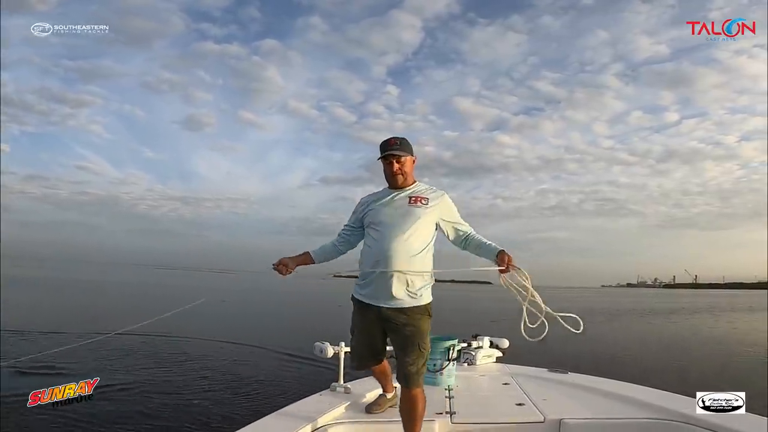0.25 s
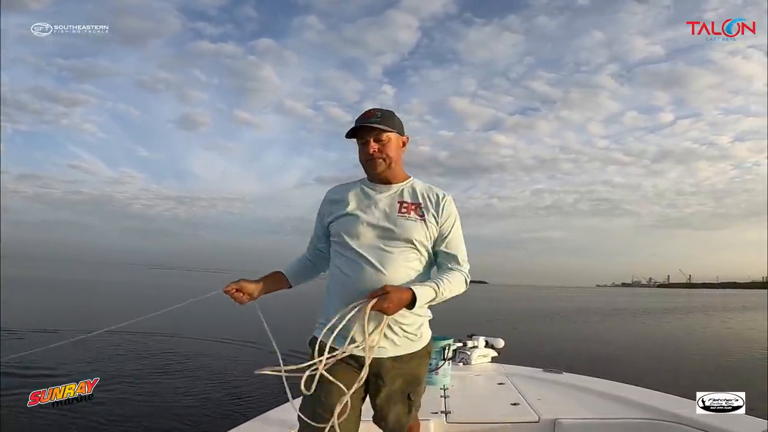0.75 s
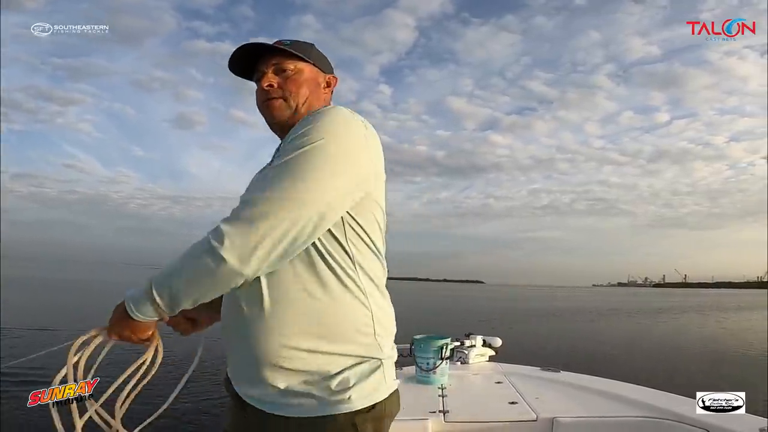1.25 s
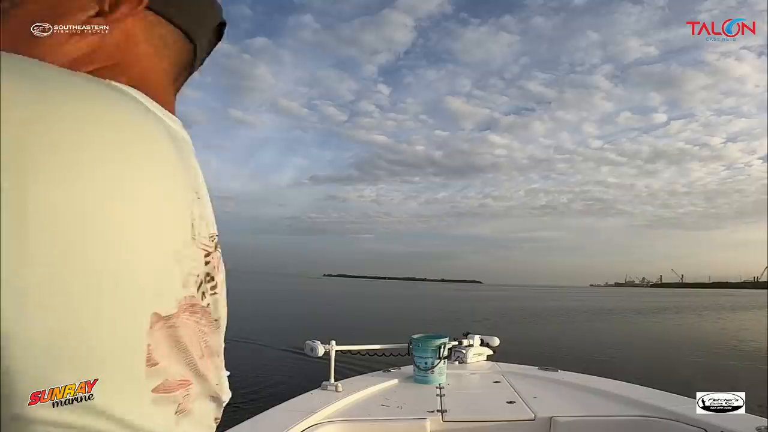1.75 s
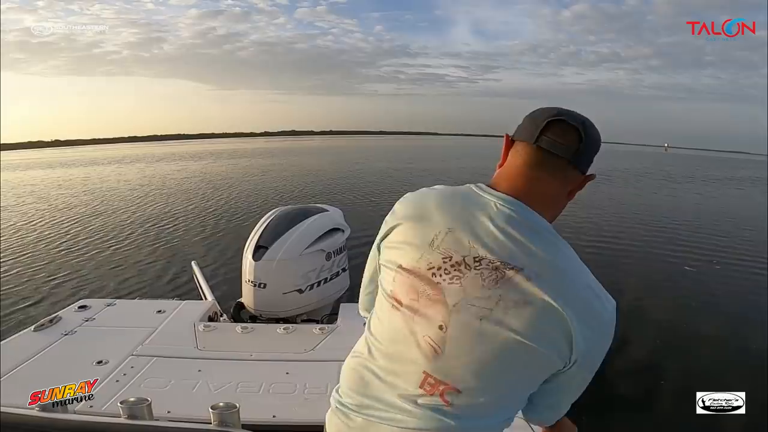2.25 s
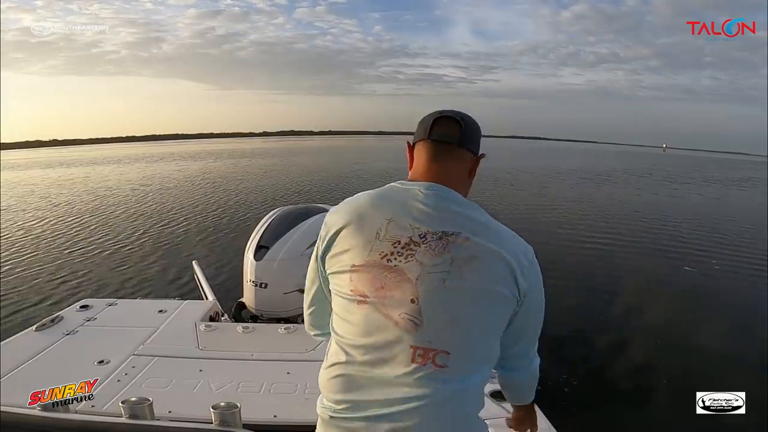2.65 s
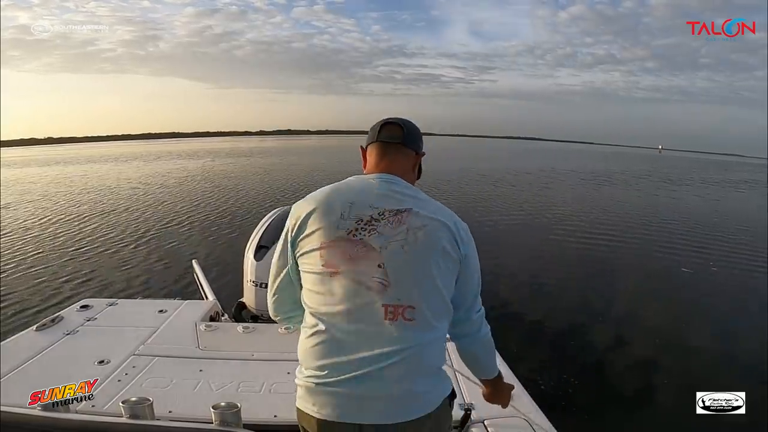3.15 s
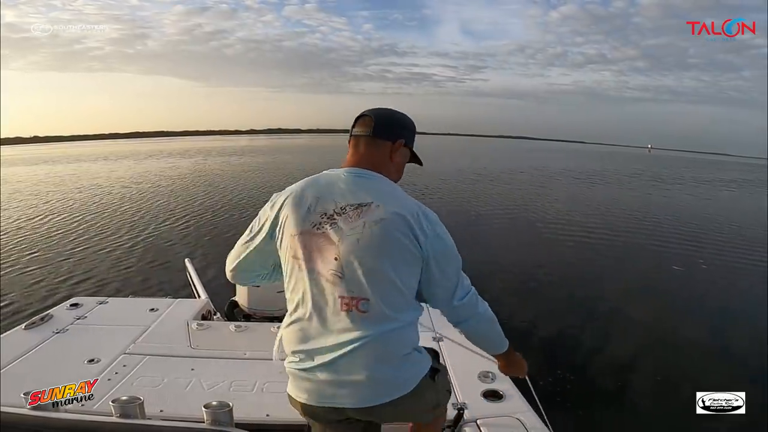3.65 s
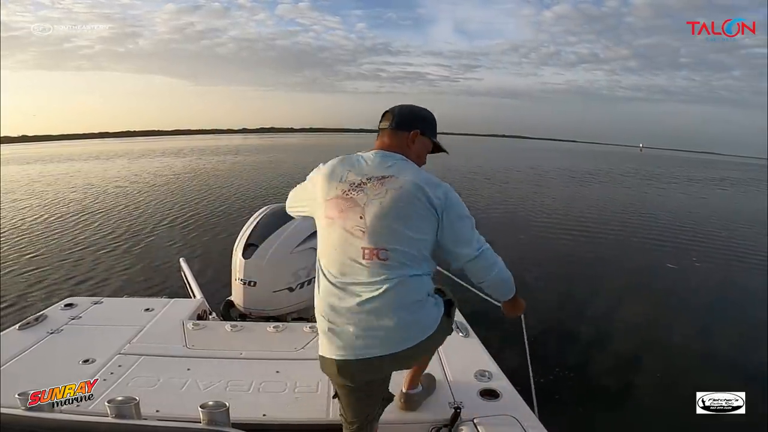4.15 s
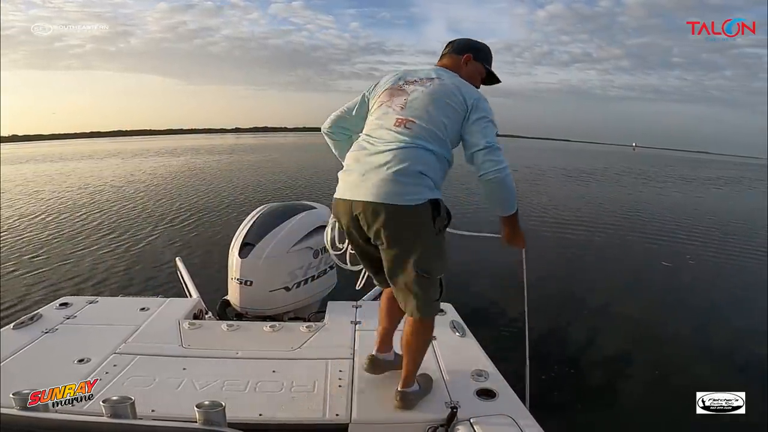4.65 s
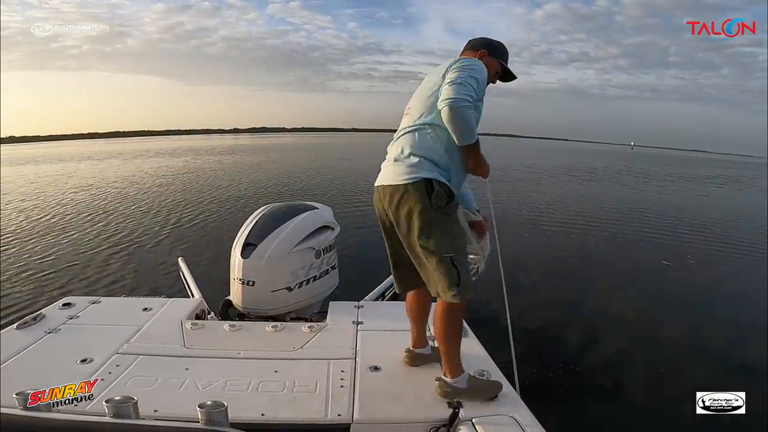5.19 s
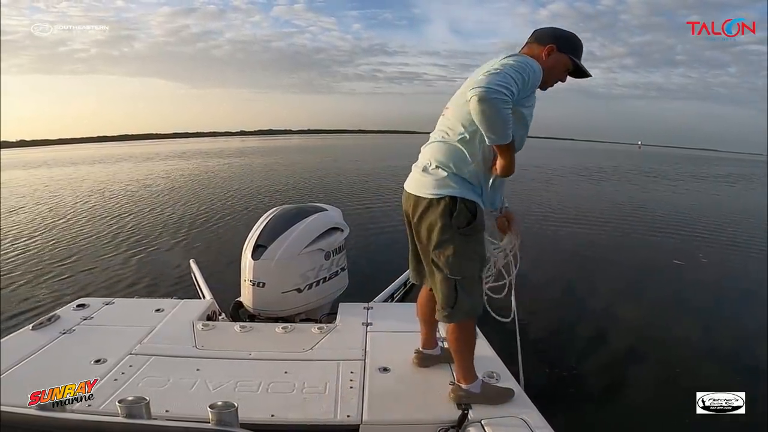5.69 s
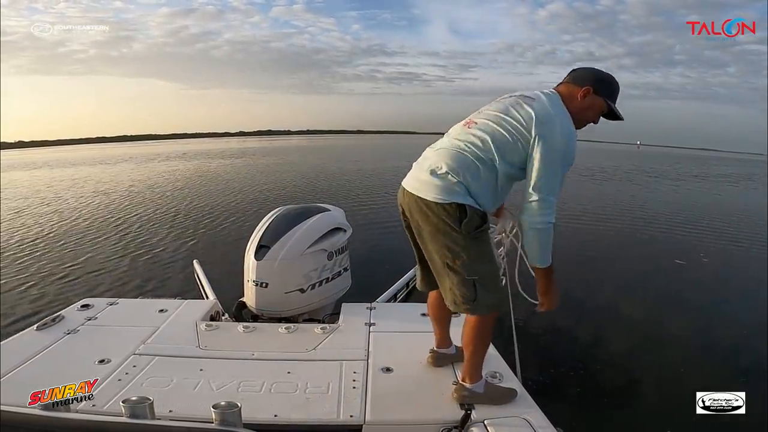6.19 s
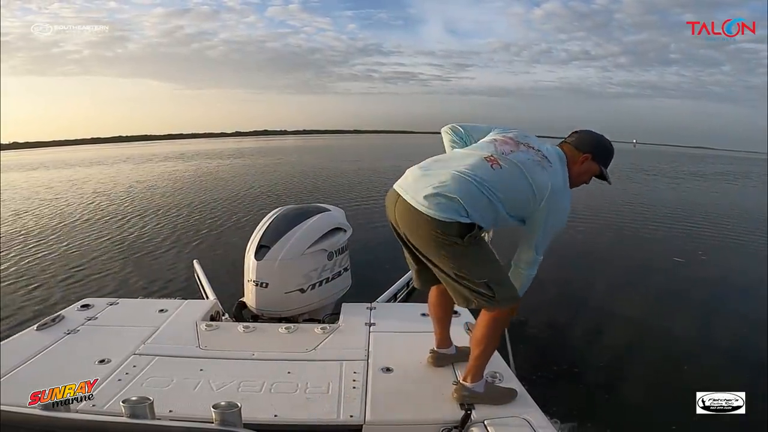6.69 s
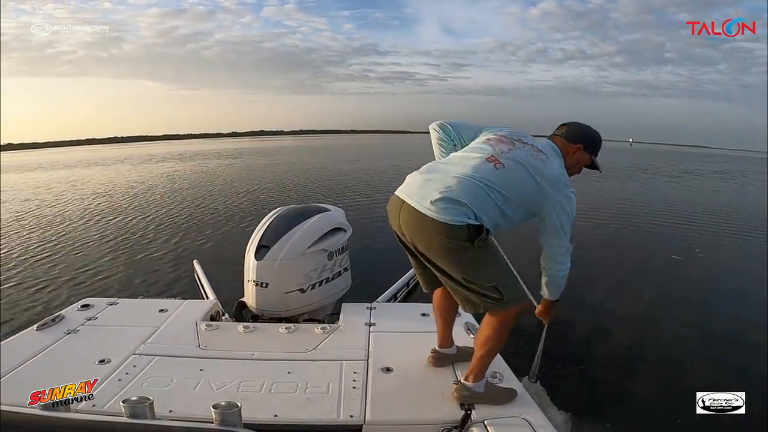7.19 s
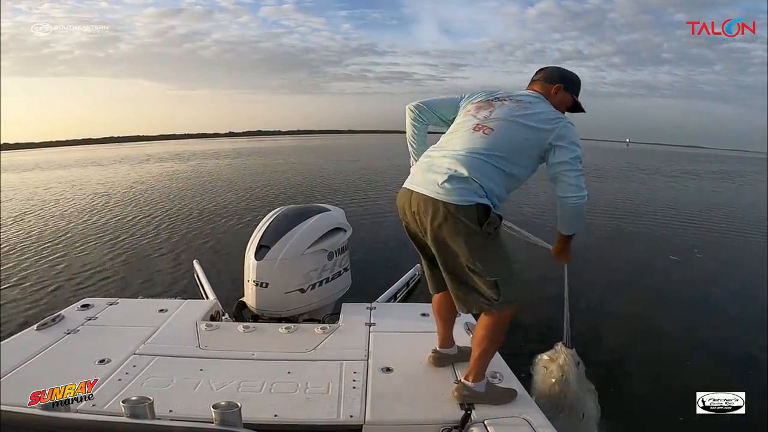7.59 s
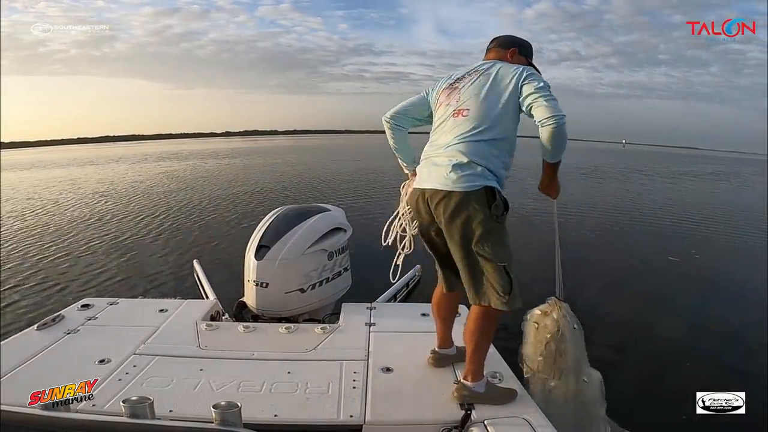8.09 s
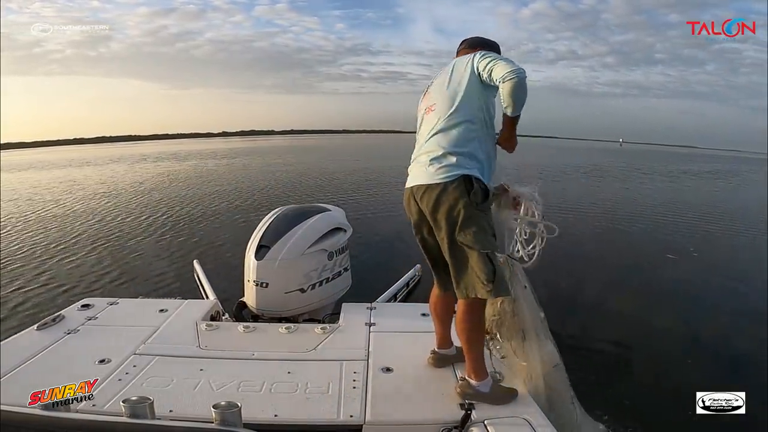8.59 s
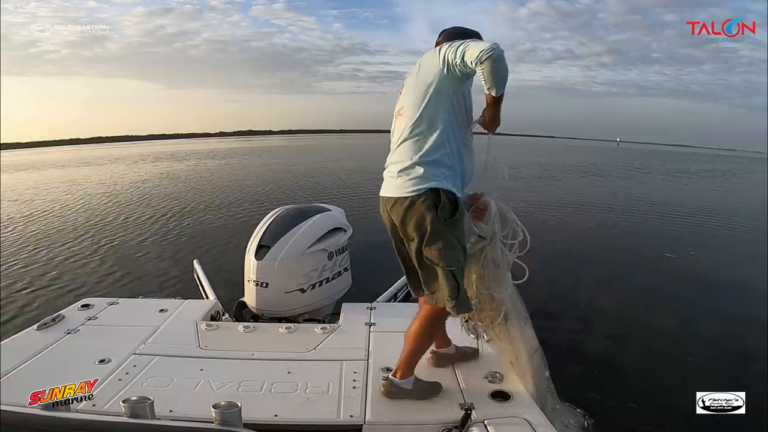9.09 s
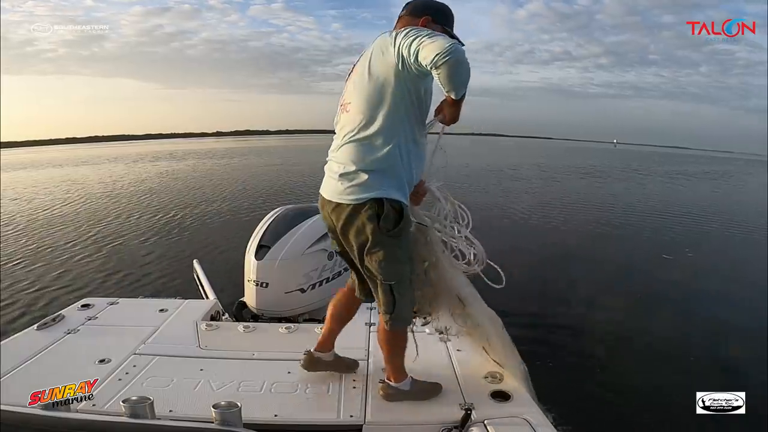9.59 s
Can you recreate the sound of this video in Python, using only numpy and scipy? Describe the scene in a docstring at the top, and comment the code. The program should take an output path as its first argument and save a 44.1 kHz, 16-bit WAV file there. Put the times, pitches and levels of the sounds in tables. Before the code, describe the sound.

Outdoors on the water, with hardly any echo beyond a short scatter from deck and gunwales. Dull engine hum underlies everything. Rubbery shoe scuffs and hollow deck knocks dominate the first two seconds, followed by a brief low wind gust. Quiet rope rustling, light steps and sparse drips lead to a net leaving the water, its trickle swelling into a bright, bubbling pour with crisp drops.

```python
"""A cast net is hauled aboard a small boat: its line rustles and drips, then the net lifts and water pours off.
The water is built from noise, tiny gliding tones, bubbles and single ringing drops.
Wet soles scuff, judder and squeak from slipping contacts, and footfalls ring the modes of the hollow deck.
A gust of shaped noise with sinking moans brushes the microphone, and a faint thin tone sounds briefly.
Behind it all lie a low engine rumble with wavering hum lines and the soft hiss of open air."""
import sys
import numpy as np
from scipy import signal
from scipy.fft import rfft, irfft
from scipy.io import wavfile
from scipy.ndimage import uniform_filter1d, map_coordinates

SR = 44100
rng = np.random.default_rng(int(sys.argv[2]) if len(sys.argv) > 2 else 0)


def unload_wav(signal):
    """Save mono or channel-first audio to the path in sys.argv[1] as 16-bit WAV at rate SR, clipped to [-1, 1]."""
    wavfile.write(
        sys.argv[1],
        SR,
        np.round(np.clip(np.atleast_2d(signal).T, -1, 1) * 32767).astype(np.int16),
    )


N = 433944  # length in samples
TIME = np.arange(N) / SR
EDGE_HZ = 15700  # nothing sounds above this

# Tone colour of splashing water. Each row: frequency in Hz, relative level in dB per Hz.
SPLASH_COLOUR = [(300, -36.5), (500, -16), (650, -15), (860, -6.5), (1200, -5), (1800, -3.5), (2500, -3),
                 (3200, -8.5), (4200, -7), (5000, -12), (6300, -12.5), (7000, -18.5), (9500, -22.5),
                 (11500, -33.5), (15500, -38)]
# Tone colour of a sole rubbing on the deck. Each row: frequency in Hz, relative level in dB per Hz.
SOLE_COLOUR = [(240, -35.5), (400, -18), (503, 0.5), (653, -9), (1030, 0), (1190, -5.5), (1340, -1.5),
               (1630, -2.5), (2090, -2.5), (3970, -6.5), (6090, -14), (7790, -20.5), (15500, -46)]


def amp(db):
    """Turns decibels into gain."""
    return 10 ** (np.asarray(db) / 20)


def unit(x):
    """Scales a sound to an rms (average strength) of one."""
    return x / np.sqrt(np.mean(x ** 2) + 1e-20)


def read(points, hz):
    """Reads a table between its rows on a log-frequency axis."""
    f, value = np.transpose(points)
    return np.interp(np.log(hz + 1), np.log(f + 1), value)


def add(mix, s, sound):
    """Mixes a sound in at time s."""
    part = mix[..., max(round(s * SR), 0):][..., :sound.shape[-1]]
    part += sound[..., :part.shape[-1]]


def colour(x, spectrum, tilt_db=0):
    """Filters x by a spectrum, tilted in dB per octave between 500 and 9000 Hz, at unit rms."""
    hz = np.fft.rfftfreq(x.shape[-1], 1 / SR)
    octaves = np.log2(np.clip(hz, 500, 9000) / 2000)
    gain = amp(read(spectrum, hz) + tilt_db * octaves)
    return unit(irfft(rfft(x) * gain, x.shape[-1]))


def diffuse(pair):
    """Turns two unrelated signals into a left and right whose likeness depends on frequency."""
    # How alike the two channels are. Each row: frequency in Hz, likeness from 0 to 1.
    likeness = [(20, 0), (60, 0.76), (130, 1), (500, 0.9), (1200, 0.54), (3000, 0.3), (7000, 0.25),
                (13000, 0.4)]
    same = np.clip(read(likeness, np.fft.rfftfreq(N, 1 / SR)), 0, 1)
    mid, side = rfft(pair) * np.sqrt([1 + same, 1 - same])
    return irfft(np.array([mid + side, mid - side]), N)


def noise(spectrum):
    """Makes diffuse stereo noise of a given colour."""
    return colour(diffuse(rng.standard_normal((2, N))), spectrum)


def wander(rate, size=N):
    """Drifts at random between new values, about rate of them a second, at an rms near one."""
    knots = rng.standard_normal(4096)
    return map_coordinates(knots, [np.arange(size) * rate / SR], order=1, mode="wrap") * np.sqrt(3 / 2)


def clicks(rate, spread_db, size=N):
    """Scatters random clicks of either sign: many small, a few large."""
    chance, strength, sign = rng.random((3, size))
    size_db = spread_db * np.minimum(-np.log(1 - strength), 4)
    return (chance < rate / SR) * np.sign(sign - .5) * amp(size_db)


def swell(s, rise_db_per_s, hold, fall_db_per_s):
    """Gain over time that builds to one at s, holds, and dies away."""
    early, late = np.maximum(s - TIME, 0), np.maximum(TIME - s - hold, 0)
    return amp(-rise_db_per_s * early - fall_db_per_s * late)


def chirps(rate, spread_db, cycles, glide, top_hz, count=32):
    """A stereo cloud of tiny dying tones of many pitches, each gliding for a few cycles."""
    out = np.zeros((2, N))
    for hz in np.geomspace(600, min(top_hz, 14000), count):
        life = cycles * rng.uniform(0.18, 2.56) / hz
        u = np.arange(int(life * SR) + 4) / (life * SR)  # age as a share of its life
        tone = np.sin(2 * np.pi * hz * life * u * (1 + glide * u))
        ping = tone * amp(-45 * u) * (1 - np.exp(-30 * u))
        sound = signal.oaconvolve(clicks(rate / count, spread_db) * hz, ping / np.sqrt(life * hz))[:N]
        out[0] += sound
        out[1] += np.roll(sound, rng.integers(5, 40)) * rng.choice([-1, 1])
    return unit(diffuse(out))


def splat(hz, size, skirt_db=12):
    """Noise centred on a pitch, falling off per octave to both sides and dull at the very top."""
    grains = colour(rng.standard_normal(size), [(hz / 8, -3 * skirt_db), (hz, 0), (hz * 8, -3 * skirt_db)])
    return colour(grains, [(9000, 3.5), (15000, -9)])


def hand_line(rustle_db=-2, trickle_db=-3):
    """With each pull the wet line rustles through the hands and sheds drops into the water."""
    # Pulls and coils. Each row: middle in seconds, length in seconds, relative rustle and shed drops in dB.
    pull_rows = [(0.25, 0.26, -58, -51), (0.532, 0.21, -46, -56), (0.604, 0.025, -46.5, -57),
                 (0.649, 0.021, -49, -57), (0.75, 0.12, -53, -62), (0.868, 0.037, -42, -66),
                 (1.363, 0.21, -51.5, -57), (1.973, 0.17, -44, -62), (3.434, 0.11, -43.5, -50),
                 (3.6, 0.24, -49, -48), (3.965, 0.21, -49, -66), (4.407, 0.22, -42.5, -66),
                 (5.003, 0.37, -56.5, -48.5), (5.662, 0.43, -47, -52.5), (5.89, 0.12, -58, -59),
                 (6.236, 0.74, -56.5, -50), (6.72, 0.31, -54, -55)]
    # Tone colour of the rustle. Each row: frequency in Hz, relative level in dB per Hz.
    rustle_colour = [(410, -31), (700, 1), (859, -9.5), (1020, 1.5), (1590, -5.5), (2030, -3), (3260, -8.5),
                     (3950, -7), (4270, -9), (9330, -20.5), (15000, -42.5)]
    edge_db, sleeves_db = -7, -64.5  # level at the ends of a pull; sleeves still rustle between pulls
    rubbing, shedding = amp(sleeves_db) * hush(), 0
    for s, length, rub_db, drops_db in pull_rows:
        arch = amp(edge_db * np.minimum((2 * (TIME - s) / length) ** 2, 20))
        rubbing = rubbing + amp(rub_db) * arch
        shedding = shedding + amp(drops_db) * arch
    fibres = diffuse(np.array([clicks(4000, 3.5), clicks(4000, 3.5)])) * amp(1.3 * wander(55))
    rustle = colour(fibres, rustle_colour) * rubbing * amp(rustle_db)
    drops = chirps(rate=400, spread_db=3.5, cycles=20, glide=.05, top_hz=6000)
    patter = colour(drops, SPLASH_COLOUR, -1)
    return rustle + patter * shedding * amp(trickle_db)


def pour(wash_db=-4, spray_tilt_db=2.5, surge_db=1):
    """Streams from the net break into dense drops, rising bubbles, gurgles and a fine wash."""
    # The pour swells and slackens as the net shifts.
    # Each row: middle in seconds, length in seconds, change in dB.
    surge_rows = [(8.075, 0.17, 2.5), (8.874, 0.17, -0.5), (9.09, 0.3, -1.5)]
    # The net clears the water; the pour starts weak and grows as more mesh hangs in the air.
    lift_s, ramp_s, grow_s = 7.13, 0.13, 0.96
    full_db, start_db = -32.5, -17  # start_db is added to full_db at first
    spray = chirps(rate=4500, spread_db=3.4, cycles=9, glide=.05, top_hz=12500)
    plops = chirps(rate=520, spread_db=3.2, cycles=25, glide=.1, top_hz=4000)
    wash = diffuse(rng.standard_normal((2, N)))
    fine = colour(spray + amp(wash_db) * wash, SPLASH_COLOUR, spray_tilt_db)
    water = unit(fine + colour(plops, SPLASH_COLOUR) + amp(-3) * gurgles())
    lifted = np.maximum(TIME - lift_s, 0)
    flow = np.minimum(lifted / ramp_s, 1) * amp(full_db + start_db * np.exp(-lifted / grow_s))
    shifts_db = sum(db * np.exp(-(2 * (TIME - s) / length) ** 2) for s, length, db in surge_rows)
    return water * flow * amp(shifts_db + surge_db * wander(35))


def gurgles(low_hz=750, high_hz=4200, clump_db=5, clumps_per_s=30, count=9):
    """Each stream churns up bubbles of its own size, in clumps that come and go."""
    hz = np.fft.rfftfreq(N, 1 / SR)
    churn, out = rfft(diffuse(rng.standard_normal((2, N)))), 0
    for centre in np.geomspace(low_hz, high_hz, count):
        band = irfft(churn / (1 + (10 * (hz / centre - 1)) ** 2), N)
        out = out + band * amp(clump_db * np.clip(wander(clumps_per_s), -2, 2))
    return colour(out, SPLASH_COLOUR)


def slop():
    """One low slop of noise as the net's load breaks the surface beside the hull."""
    # Tone colour of the slop. Each row: frequency in Hz, relative level in dB per Hz.
    slop_colour = [(150, -30.5), (300, -2), (430, 11.5), (650, -4), (1300, -9), (2200, -22), (6000, -31),
                   (15000, -76)]
    return noise(slop_colour) * amp(-24.5) * swell(7.472, rise_db_per_s=620, hold=0.0054, fall_db_per_s=286)


def splashes(level_db=0, skirt_db=16, attack_s=0.0061, t60=.063, wash_db=-12):
    """A clump of water falls back and breaks into a brief crowd of bubbles of about one size."""
    # Soft splashes. Each row: start in seconds, level in dB, length in seconds, centre in Hz.
    splash_rows = [(.208, -48, 0.027, 2190), (.46, -51, .07, 2300), (4.493, -50, .04, 2080),
                   (5.45, -46, .025, 1790), (5.842, -44, .03, 1900), (6.138, -43, 0.015, 3150),
                   (6.25, -46, 0.033, 1680), (6.518, -46, 0.027, 2580), (6.602, -47, 0.087, 2180),
                   (6.935, -49, 0.035, 1690), (7, -46, 0.041, 1220), (7.18, -49, .05, 3600),
                   (7.319, -44.5, 0.023, 2420), (8.005, -36, .025, 2000), (8.235, -37, .025, 1400),
                   (8.319, -34.5, 0.027, 1100), (9.077, -42, .03, 1100), (9.293, -35, 0.023, 1510),
                   (9.42, -36.5, .025, 850), (9.49, -34, 0.032, 2100), (9.612, -31.5, 0.034, 1700)]
    out, t = np.zeros((2, N)), np.arange(SR // 5) / SR
    crowd = chirps(rate=1500, spread_db=2.5, cycles=26, glide=.08, top_hz=6000)
    crowd = crowd + amp(wash_db) * unit(diffuse(rng.standard_normal((2, N))))
    for s, db, length, hz in splash_rows:
        size = [(hz / 8, -4 * skirt_db), (hz / 2, -skirt_db), (hz, 0), (hz * 2, -skirt_db), (hz * 8, -3 * skirt_db)]
        bubbles = colour(np.roll(crowd, -round(s * SR), axis=1)[:, :len(t)], size)
        fade_db = -60 * np.maximum(t - length, 0) / t60
        add(out, s, bubbles * np.minimum(t / attack_s, 1) * amp(db + level_db + fade_db))
    return out


def drips(level_db=-5, t60=0.023, splat_db=2):
    """Each single large drip makes a splat and a brief ring."""
    # Sharp drips. Each row: start in seconds, relative level in dB, ring in Hz.
    drip_rows = [(.127, -45, 6000), (0.183, -37, 5930), (.252, -43, 3650), (.304, -44, 5500),
                 (.33, -43, 6300), (.395, -41, 4970), (.475, -41, 5200), (1.179, -34, 5670),
                 (1.232, -41, 4360), (1.24, -41, 2850), (1.353, -37.5, 4300), (2.909, -29, 7430),
                 (4.346, -29, 2820), (5.665, -33, 3950), (5.686, -32.5, 4170), (6.053, -33.5, 8400),
                 (6.249, -32, 8060), (6.392, -37, 4250), (7.221, -35, 4130), (7.279, -36, 4400),
                 (8.178, -23.5, 3900), (8.231, -24.5, 3020), (8.613, -17, 2700), (8.993, -28, 2810),
                 (9.221, -17, 4020), (9.333, -25, 9550), (9.465, -15.5, 5500)]
    out, t = np.zeros(N), np.arange(SR // 20) / SR
    for s, db, hz in drip_rows:
        hit = np.sin(2 * np.pi * hz * t) + amp(splat_db) * splat(hz, len(t))
        add(out, s, hit * (1 - np.exp(-t / 0.00028)) * amp(db + level_db - 60 * t / t60))
    return out


def blips(level_db=3, t60=0.038, rise_per_s=2, splash_db=-5):
    """A large drop splashes and leaves a bubble that rings and climbs in pitch."""
    # Single large bubbles. Each row: start in seconds, relative level in dB, starting pitch in Hz.
    blip_rows = [(.15, -35, 675), (0.179, -37.5, 1500), (5.866, -33, 1214), (6.0752, -37, 1600),
                 (6.422, -39, 2400), (6.477, -36.5, 2190), (6.539, -38, 2580), (6.631, -41, 2360),
                 (8.012, -27, 2050), (8.047, -27.5, 1290), (8.42, -32, 890), (8.545, -27, 1710),
                 (8.952, -25.5, 2020), (8.993, -27, 2840), (9.047, -25, 854), (9.493, -24, 1860),
                 (9.614, -22, 2050)]
    out, t = np.zeros(N), np.arange(SR // 12) / SR
    for s, db, hz in blip_rows:
        ring = np.sin(2 * np.pi * hz * t * (1 + rise_per_s * t)) + amp(splash_db) * splat(hz, len(t))
        add(out, s, ring * (1 - np.exp(-t / 0.0015)) * amp(db + level_db - 60 * t / t60))
    return out


def scuffs(slips_per_s=3200, spread_db=3.3, judder_db=2.3, chirp_db=0):
    """A sole drags over the gritty deck: an uneven burst of tiny slips and rubbery chirps."""
    # Sole scuffs. Each row: start in seconds, level in dB, length in seconds, brightness in dB per octave.
    scuff_rows = [(0.536, -23, 0.0031, -3.5), (1.024, -36, 0.012, -5), (1.037, -20, 0.011, -3.5),
                  (1.077, -24, 0.021, 0.5), (1.084, -19.5, 0.0074, 2.5), (1.102, -17.5, 0.0097, 0.5),
                  (1.113, -28, 0.0049, -3), (1.58, -24.5, 0.024, -1), (1.592, -19, 0.058, -3),
                  (1.659, -20, 0.037, -1.5), (1.739, -21, 0.022, -2), (1.791, -37.5, 0.021, -2),
                  (1.831, -24.5, 0.024, 0.5), (1.868, -19.5, 0.016, -2.5), (2.142, -35, 0.016, 6),
                  (2.162, -30, 0.019, 0), (2.193, -23, 0.02, 3.5), (2.227, -35, 0.0081, 3),
                  (2.359, -29, 0.042, 5), (2.848, -36.5, 0.024, -2.5), (3.334, -27, 0.0083, 4),
                  (3.461, -42, 0.035, 8.5), (3.774, -28.5, 0.008, 2), (3.791, -32, 0.011, 6.5),
                  (4.249, -41, 0.071, 1), (4.409, -17.5, 0.012, 3), (4.421, -31.5, 0.015, 5),
                  (4.976, -44.5, 0.021, 7), (4.996, -40.5, 0.0047, 4.5), (5.137, -35, 0.044, 6),
                  (5.517, -32, 0.031, -0.5), (6.135, -41, 0.0077, -3)]
    # The sole presses down for a share of each scuff; a longer slide fades more slowly, up to a limit.
    press_share, fade_per_length, longest_fade_s = 0.39, 10.5, 0.11
    out, t = np.zeros((2, N)), np.arange(SR // 3) / SR
    rubber = chirps(rate=2300, spread_db=2.5, cycles=21.7, glide=-0.088, top_hz=10940)
    for s, db, length, bright_db in scuff_rows:
        slips = unit(clicks(slips_per_s, spread_db, size=len(t)))
        squeal = amp(chirp_db) * rubber[:, round(s * SR):][:, :len(t)]
        rub = colour(slips + squeal, SOLE_COLOUR, bright_db)
        fade = min(fade_per_length * length, longest_fade_s)
        press = np.minimum(t / (press_share * length), 1) ** 2
        press = press * amp(-60 * np.maximum(t - length, 0) / fade)
        add(out, s, rub * press * amp(db + judder_db * wander(147, size=len(t))))
    return out


def judder(t60=0.009, uneven_db=3, grit_db=2, stray=0.11):
    """A sole grips and lets go in a quick run of slips, each a short gritty ring: a rubbery croak."""
    start_s, length_s, level_db = 1.612, 0.08, -20
    slips_per_s, ring_hz = 250, 2270  # average rate and pitch; each slip strays a little
    run, t = np.zeros(int(length_s * SR)), np.arange(SR // 100) / SR
    for s in np.arange(0, length_s, 1 / slips_per_s):
        late, detune, force = rng.standard_normal(3)
        tone = np.sin(2 * np.pi * ring_hz * (1 + stray * detune) * t)
        slip = tone + amp(grit_db) * splat(ring_hz, len(t))
        add(run, s + stray * late / slips_per_s, slip * amp(uneven_db * force - 60 * t / t60))
    out = np.zeros(N)
    add(out, start_s, amp(level_db) * colour(run * signal.windows.tukey(len(run), .7), SOLE_COLOUR))
    return out


def squeaks(jitter=0.071, level_db=1, count=6):
    """Wet rubber sticks and slips at an unsteady, gliding pitch."""
    # Squeaks. Each row: start in seconds, length in seconds, relative level in dB, start pitch in Hz,
    # end pitch in Hz, step from each overtone to the next in dB.
    squeak_rows = [(1.099, 0.021, -21, 950, 866, -3.5), (1.368, 0.043, -48, 1750, 1590, -20),
                   (1.864, 0.03, -22.5, 3930, 2195, -18), (2.196, 0.018, -25.5, 1570, 1290, -6),
                   (2.353, 0.032, -36.5, 2780, 4080, -18), (2.373, 0.05, -32.5, 1400, 1268, -9),
                   (4.401, 0.0073, -23.5, 3440, 4040, -21), (4.414, 0.0087, -23.5, 1370, 1660, -12),
                   (4.416, 0.011, -19.5, 3140, 3300, -20), (4.994, 0.0071, -27, 2020, 1540, -19),
                   (5.155, 0.027, -35, 4600, 5300, -22), (5.168, 0.032, -34, 4040, 6000, -24),
                   (5.511, 0.017, -33.5, 2850, 2620, -8.5), (5.523, 0.03, -29.5, 1305, 795, -1.5),
                   (9.226, 0.012, -31, 1770, 1500, -18), (9.239, 0.011, -30.5, 6920, 3460, -19),
                   (9.457, 0.014, -30, 4640, 6070, -26)]
    out = np.zeros(N)
    for s, length, db, start_hz, end_hz, overtone_db in squeak_rows:
        hz = np.geomspace(start_hz, end_hz, max(int(length * SR), 8))
        phase = 2 * np.pi * np.cumsum(hz * (1 + jitter * wander(1448, size=len(hz)))) / SR
        tone = 0
        for k in range(count):
            audible = (k + 1) * hz < EDGE_HZ
            tone = tone + amp(overtone_db * k) * np.sin((k + 1) * phase) * audible
        add(out, s, amp(db + level_db) * unit(tone * signal.windows.tukey(len(hz), .5)))
    return out


def steps(thud_db=-3, slap_db=-4, slap_t60=0.085):
    """Each footfall slaps and rings the hollow deck; a longer contact weakens the high modes."""
    # Footfalls. Each row: start in seconds, level in dB, contact time in seconds.
    step_rows = [(.538, -6, 0.0011), (.562, -37, 0.0057), (1.098, -18.5, 0.0059), (1.678, -16, 0.0032),
                 (1.889, -6, 0.0024), (1.905, -11, 0.0074), (3.654, -19, 0.0021), (4.333, -20, 0.0021),
                 (5.535, -17, 0.0084)]
    # Deck modes. Each row: average frequency in Hz, relative level in dB, time to fall 60 dB in seconds.
    deck_modes = [(51.2, -4, 0.37), (79.9, 1.5, 0.32), (116.4, 3, 0.18), (178.8, -5, 0.33),
                  (257.7, -9.5, 0.32), (318.5, -12, 0.24), (473, -1.5, 0.078), (541, -3.5, 0.071),
                  (666, -14, 0.13), (957, -17.5, 0.078), (1270, -14.5, 0.11), (1940, -3, 0.019)]
    # Slap of a shoe. Each row: frequency in Hz, relative level in dB per Hz.
    slap_colour = [(100, 9), (450, 3), (1100, -5), (2000, -24), (4000, -40), (8000, -52), (15000, -80)]
    out, t = np.zeros(N), np.arange(SR // 2) / SR
    for s, db, contact in step_rows:
        slap = colour(rng.standard_normal(len(t)), slap_colour)
        ring = slap * amp(slap_db - 60 * t / slap_t60) / np.hypot(1, 700 * contact)
        for hz, mode_db, t60 in deck_modes:
            # each step detunes the mode a little
            swing = np.sin(2 * np.pi * (hz * rng.uniform(0.98, 1.04) * t + rng.random()))
            swing = swing * (1 - np.exp(-2 * hz * t))
            ring = ring + swing * amp(thud_db + mode_db - 60 * t / t60) / np.hypot(1, hz * contact)
        add(out, s, amp(db) * ring * (1 - np.exp(-t / contact)))
    return out


def gust(flutter_db=0.96, flap_db=2.0, flaps_per_s=90, rush_db=-3, hollow_arch_db=4):
    """Air rushes over the microphone with sinking moans, a hollow band and flapping hiss, and buffets it."""
    # Gusts. Each row: full strength reached in seconds, hold in seconds, build-up in dB per second,
    # then relative levels of rush, hollow band and hiss in dB.
    gust_rows = [(2.899, 0.36, 46, -26, -33, -38), (3.386, 0.02, 200, -27.5, -42.5, -45)]
    # Sinking resonances. Each row: start in Hz, end in Hz, width in Hz, level relative to the rush in dB.
    moan_rows = [(187, 63, 30, 3.5), (449, 345, 70, -7), (560, 510, 64, -8.5)]
    # Tone colours of the four kinds of air noise. Each row: frequency in Hz, relative level in dB per Hz.
    rush_colour = [(120, -29), (200, 2), (280, -9), (360, 2.5), (440, -3), (530, -4), (640, -14),
                   (830, -21), (1040, -18), (1500, -39), (3000, -62)]
    hollow_colour = [(500, -32), (700, 5.5), (830, 2), (930, 1.5), (1040, 4), (1200, -38), (1800, -57)]
    hiss_colour = [(600, -19), (1100, 1), (1450, 1), (1780, 4), (2000, 0), (2250, 0), (2450, -2), (2680, 0),
                   (3050, -4.5), (3600, -3.5), (5000, -11.5), (9000, -22), (15000, -44)]
    buffet_colour = [(20, -37), (45, -59), (60, 15), (85, -4), (125, 2.5), (190, -14.5), (350, -20.5),
                     (900, -82)]
    moan_start_s, moan_end_s = 2.76, 3.24
    # The hiss leads the rush and the hollow band opens late and fast; both build faster by these factors.
    hiss_lead_s, hiss_build, longest_lag_s, hollow_build = 0.036, 2.3, 0.06, 4.5
    rush_fall, treble_fall = 151, 380  # dB per s: the treble dies faster than the body
    rush = hollow = hiss = 0
    for s, hold, build, body_db, hollow_db, hiss_db in gust_rows:
        lag = min(longest_lag_s, hold / 2)
        arch = amp(hollow_arch_db * np.exp(-((TIME - s - lag / 2 - hold / 2) / (hold / 2)) ** 2))
        rush += amp(body_db) * swell(s, build, hold, rush_fall)
        hollow += amp(hollow_db) * arch * swell(s + lag, hollow_build * build, hold - lag, treble_fall)
        hiss += amp(hiss_db) * swell(s - hiss_lead_s, hiss_build * build, hold + hiss_lead_s, treble_fall)
    air = amp(rush_db) * noise(rush_colour)
    for start_hz, end_hz, width, db in moan_rows:
        hz = np.interp(TIME, [moan_start_s, moan_end_s], [start_hz, end_hz])
        phase = 2 * np.pi * np.cumsum(hz) / SR
        air = air + amp(db) * (wander(width) * np.cos(phase) + wander(width) * np.sin(phase))
    air = air * rush + noise(hollow_colour) * hollow * amp(rush_db)
    air = air + noise(hiss_colour) * hiss * amp(flap_db * wander(flaps_per_s))
    # the buffeting grows harder and harder until it drops
    buffet = amp(-13) * swell(3.22, rise_db_per_s=49, hold=0.044, fall_db_per_s=398)
    return (air * amp(flutter_db * wander(70)) + noise(buffet_colour) * buffet).mean(0)


def whistle(level_db=-64, flicker_db=4):
    """A thin, faint, flickering tone that sinks in pitch and turns up again."""
    start_s, length_s, turn_s = 1.25, .2, .125  # turn_s: seconds until the pitch turns up
    start_hz, low_hz = 10000, 8900  # course of the pitch, around which it jitters
    out, t = np.zeros(N), np.arange(int(length_s * SR)) / SR
    pitch = low_hz + (start_hz - low_hz) * (1 - t / turn_s) ** 2
    phase = 2 * np.pi * np.cumsum(pitch * (1 + .007 * wander(900, size=len(t)))) / SR
    level = amp(level_db + flicker_db * wander(70, size=len(t)))
    add(out, start_s, level * np.sin(phase) * signal.windows.tukey(len(t), .25))
    return out


def engine(rumble_db=-22, drift=0.008, waver_db=2):
    """A dull rumble through the hull with a few wavering hum lines and a low tone that drops in level."""
    # Engine and hull rumble. Each row: frequency in Hz, relative level in dB per Hz.
    rumble_colour = [(8.8, -30), (15, 1), (43, 0.5), (65, 1.5), (92, -2.5), (152, -5), (187, -10),
                     (222, -8.5), (252, -17), (277, -14.5), (363, -23), (438, -23.5), (467, -28.5),
                     (650, -37), (840, -81), (1430, -120)]
    # Hum lines. Each row: average frequency in Hz, average level in dB.
    hum_lines = [(70, -32), (111, -35), (158, -40), (224, -43)]
    drone_hz, early_db, late_db, drop_s = 260, -39.5, -57, 2.67
    turn = 2 * np.pi * np.cumsum(1 + drift * wander(5)) / SR  # all pitches drift together
    hum = sum(amp(db + waver_db * wander(6)) * np.sin(hz * turn) for hz, db in hum_lines)
    # the drop is smoothed over half a second
    drone_db = uniform_filter1d(np.where(TIME < drop_s, float(early_db), late_db), SR // 2)
    drone = amp(drone_db + waver_db * wander(9)) * np.sin(drone_hz * turn)
    return amp(rumble_db) * noise(rumble_colour) + np.sqrt(2) * (hum + drone)


def open_air(level_db=-51.5):
    """Steady noise for the open air over the water, dipping slightly around the gust."""
    # Tone colour of the air. Each row: frequency in Hz, relative level in dB per Hz.
    air_colour = [(290, -28), (500, 1), (576, 0), (835, -6), (1320, -5), (1540, -14), (1650, -9.5),
                  (6210, -22.5), (12300, -38.5), (15000, -48)]
    return amp(level_db) * noise(air_colour) * hush()


def hush(depth_db=-1):
    """Gain of the steady hiss and sleeve rustle, which dips slightly around the gust."""
    return amp(depth_db * swell(2.5, rise_db_per_s=91, hold=0.57, fall_db_per_s=91))


def boat(x, wet_db, t60):
    """Deck and gunwales scatter a near sound into a short tail, different at each side."""
    t = np.arange(SR // 6) / SR
    sparse = rng.standard_normal((2, len(t))) * (rng.random((2, len(t))) < .1)
    taps = sparse * amp(-60 * t / t60) * (t > .001)
    taps *= amp(wet_db) / np.linalg.norm(taps, axis=1, keepdims=True)
    taps[:, 0] = 1  # the direct sound
    taps /= np.linalg.norm(taps[0])
    return signal.oaconvolve(np.atleast_2d(x), taps, axes=1)[:, :N]


def aside(pair, ports, delay, diffuse_db):
    """A near sound from the right reaches that microphone port sooner; the two ports are tinted differently."""
    hz, mid = np.fft.rfftfreq(2 * N, 1 / SR), pair.mean(0)
    tint = amp(read(ports, hz) / 2)
    near = mid + amp(diffuse_db) * (pair - mid)
    filters = np.array([tint * np.exp(-2j * np.pi * hz * delay), 1 / tint])
    return irfft(rfft(near, 2 * N) * filters)[:, :N]


def sides(lean_db):
    """Left and right gains for a sound that leans to the left."""
    return amp([[lean_db / 2], [-lean_db / 2]])


def narrow(pair, narrow_db=-25.5, top_hz=9000):
    """The stereo image closes up below the treble shortly before the gust and slowly opens again."""
    side = (pair[0] - pair[1]) / 2
    below = irfft(rfft(side) / (1 + (np.fft.rfftfreq(N, 1 / SR) / top_hz) ** 2), N)
    width = amp(narrow_db * swell(2.29, rise_db_per_s=200, hold=0.31, fall_db_per_s=6.5))
    return pair - np.array([below, -below]) * (1 - width)


def scene():
    """Line, net and feet over the engine and the open air."""
    # Water beside the boat at the two microphone ports. Each row: frequency in Hz, left minus right in dB.
    water_ports = [(60, 1.0), (99, 0.5), (160, 1.5), (270, 1.0), (450, 2.0), (740, 1.5), (1220, -2),
                   (2010, 1), (3330, 0.5), (5500, -1.5), (9080, -2.5), (15000, -4)]
    # Feet on the deck at the two ports. Each row: frequency in Hz, left minus right in dB.
    deck_ports = [(200, -2), (500, 0), (1200, 1.5), (2500, 3.5), (4500, 1), (8000, -1), (13000, -4)]
    line = aside(hand_line(), water_ports, delay=.00003, diffuse_db=-1.5) * sides(lean_db=2)
    drops = boat(drips() + blips(), wet_db=-7, t60=.06)
    water = pour() + slop() + splashes() + drops
    water = aside(water, water_ports, delay=.000046, diffuse_db=-2.5)
    feet = boat(scuffs() + judder(), wet_db=-4, t60=0.063) + boat(squeaks(), wet_db=-1.5, t60=0.071)
    feet = aside(feet, deck_ports, delay=.000027, diffuse_db=-4.5)
    deck = boat(steps(), wet_db=-20, t60=.1)
    background = (engine() + open_air()) * sides(lean_db=1.07)
    return narrow(line + water + feet + deck + gust() + whistle() + background)


def record(dry):
    """Cuts off everything above the band edge with a steep low-pass filter."""
    low_pass = signal.firwin(511, EDGE_HZ, window=("kaiser", 9), fs=SR)
    return signal.oaconvolve(dry, low_pass[None], "same")


dry = scene()
out = record(dry)
unload_wav(out)
```